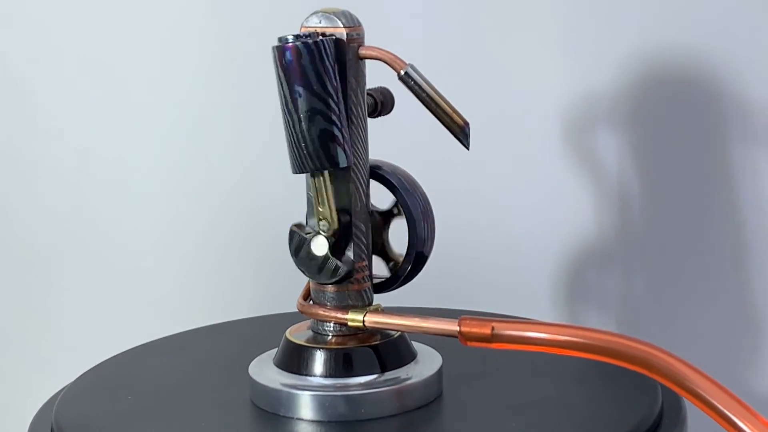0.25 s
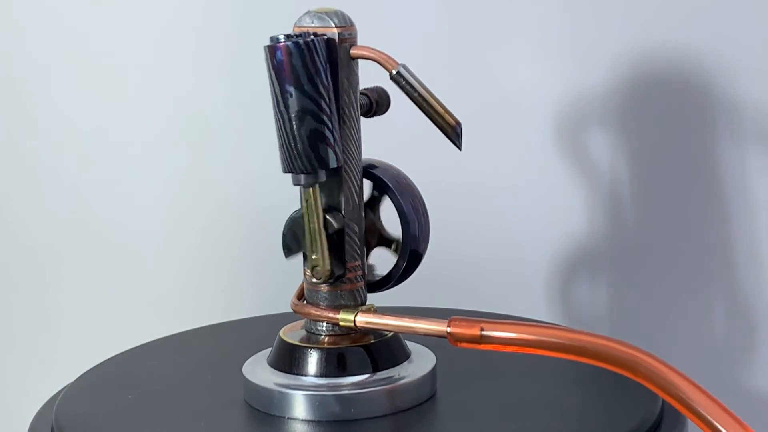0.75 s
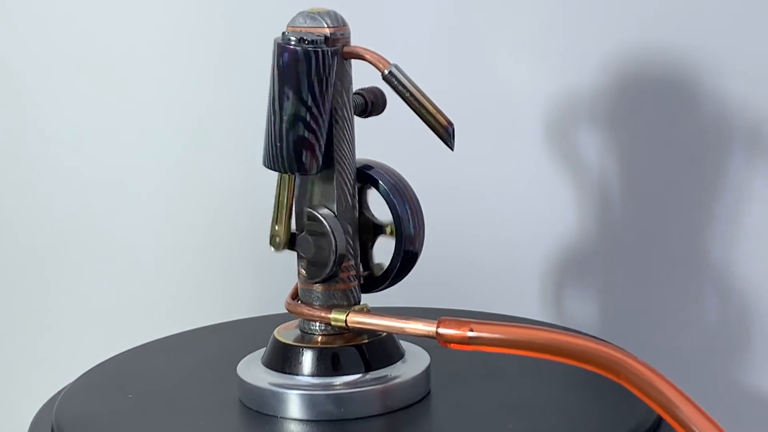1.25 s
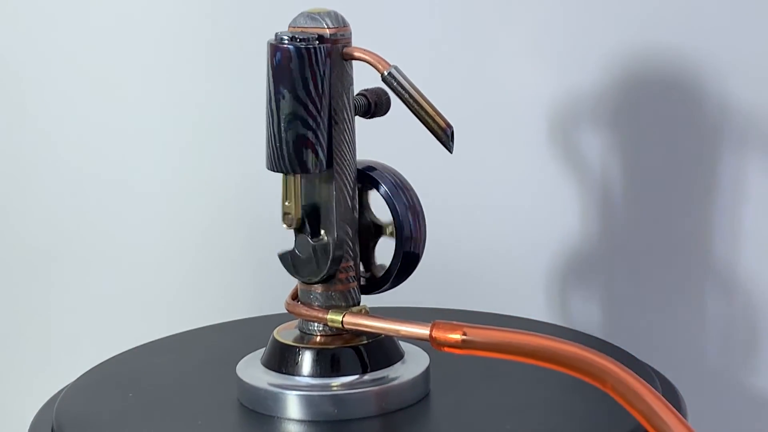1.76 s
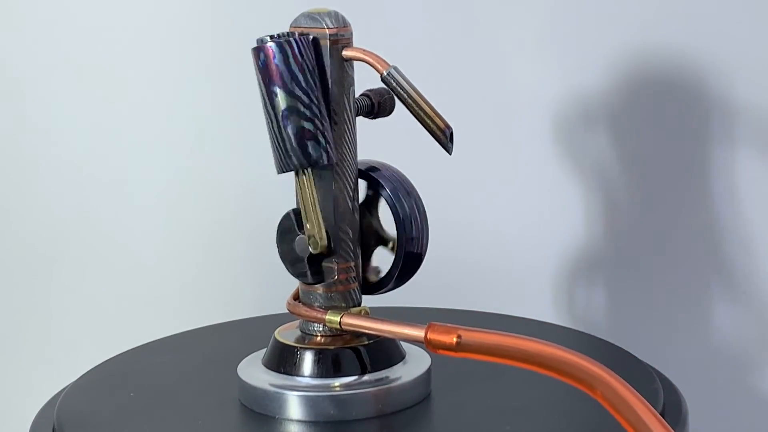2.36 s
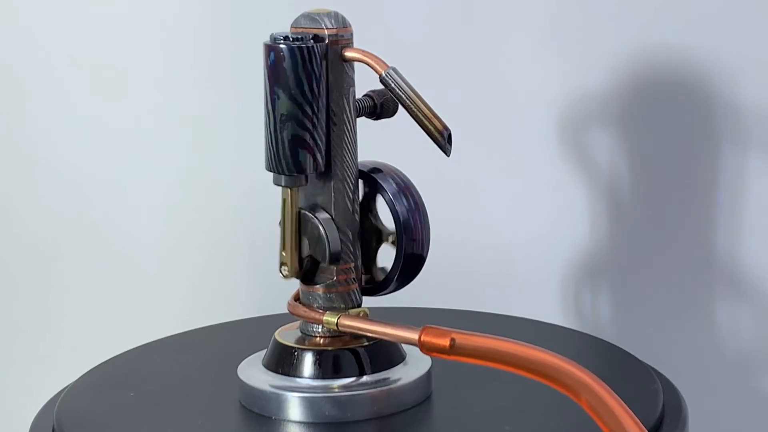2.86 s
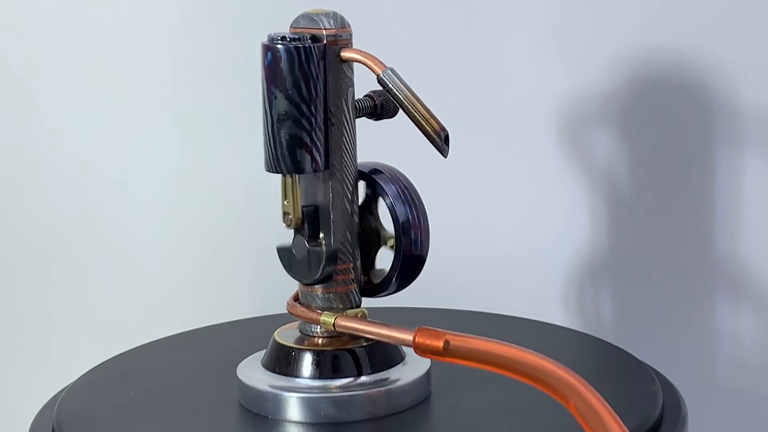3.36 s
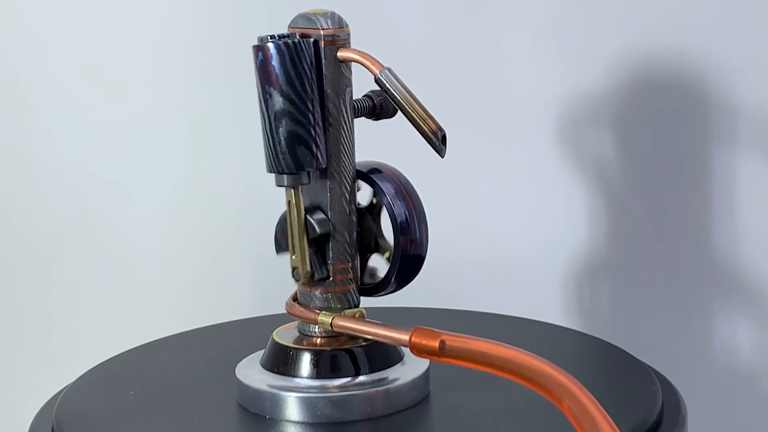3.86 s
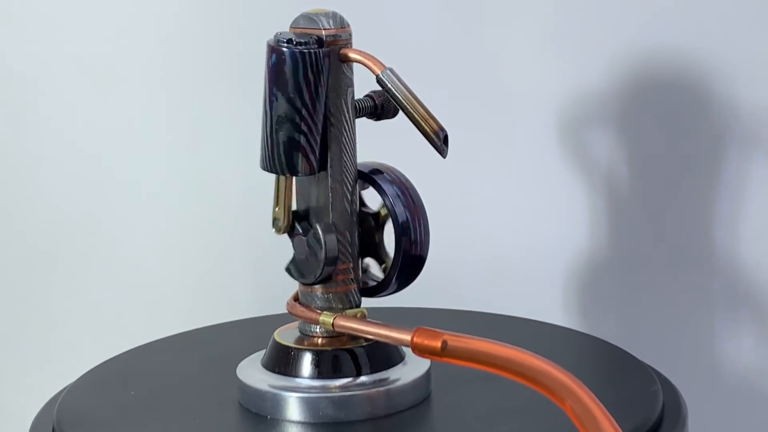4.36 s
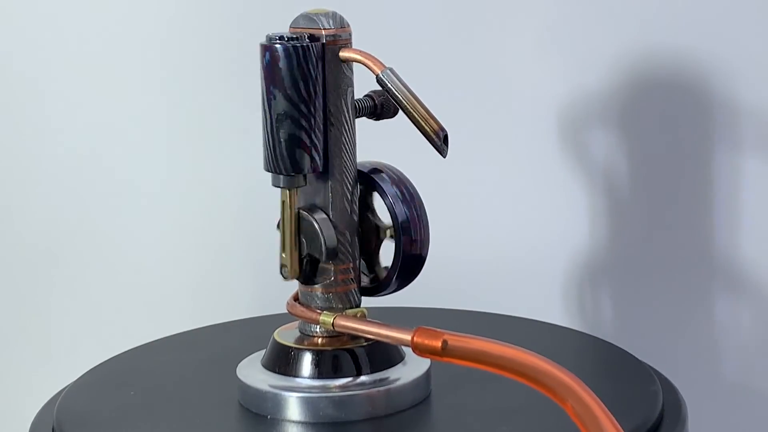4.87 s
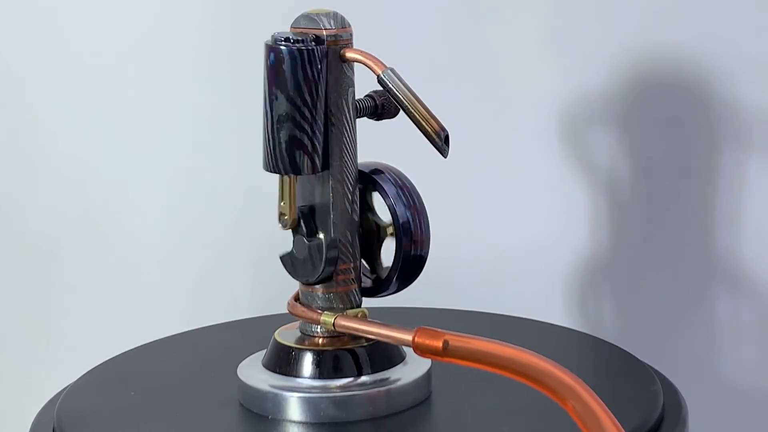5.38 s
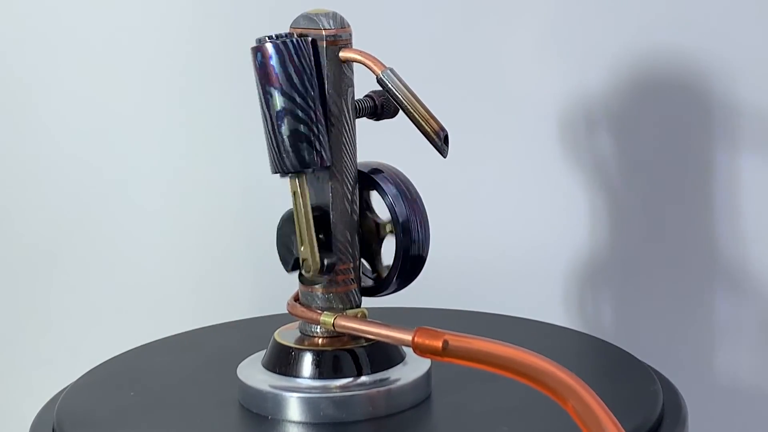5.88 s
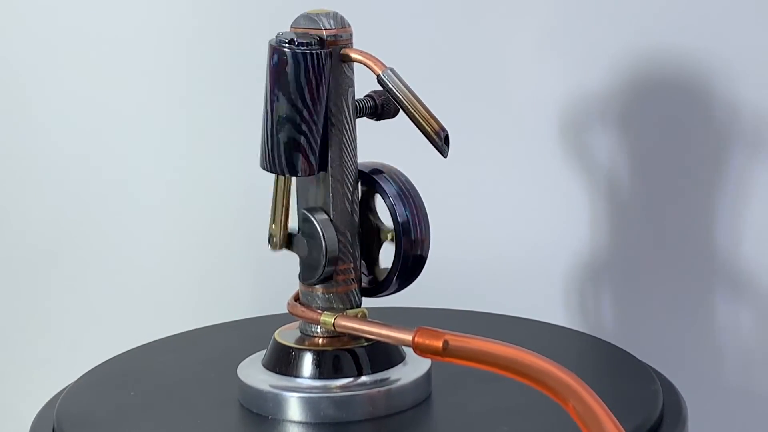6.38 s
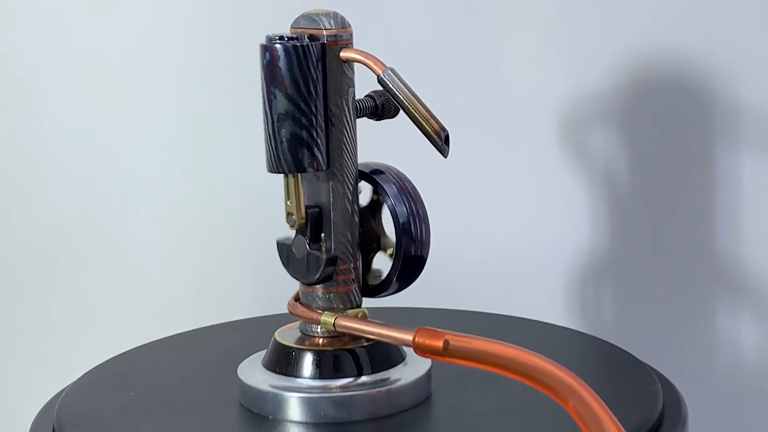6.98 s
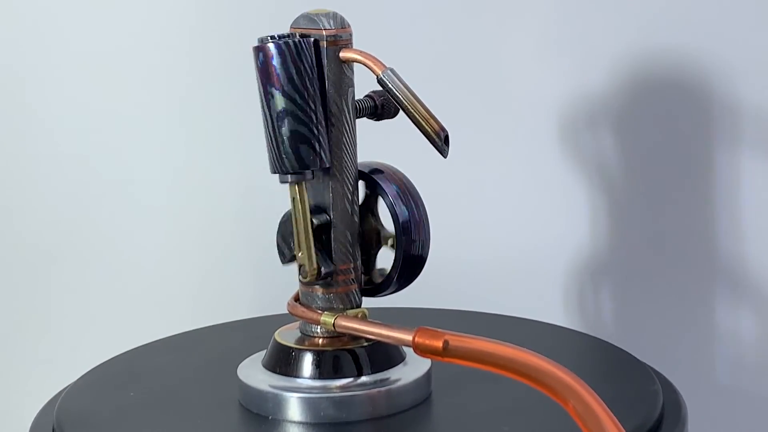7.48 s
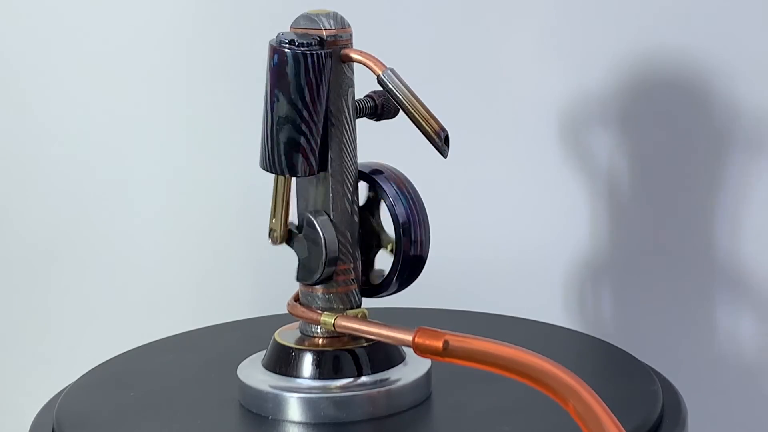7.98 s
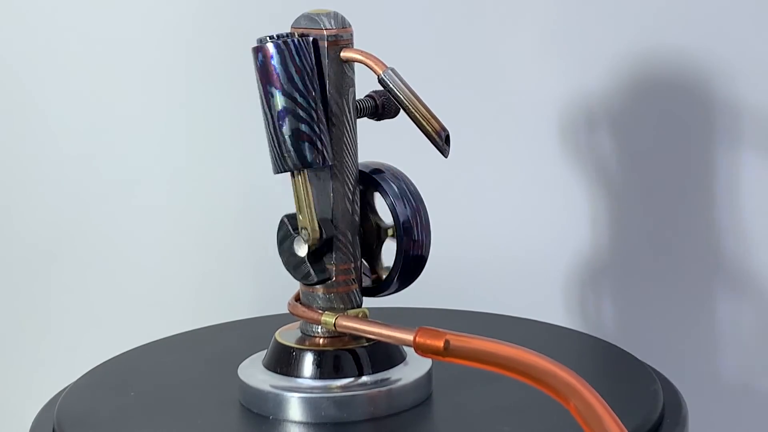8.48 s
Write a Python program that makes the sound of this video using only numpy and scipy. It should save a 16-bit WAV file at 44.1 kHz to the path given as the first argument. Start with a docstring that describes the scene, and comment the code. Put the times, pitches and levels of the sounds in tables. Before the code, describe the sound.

Rapid, buzzing puffs and light knocks from a tiny model engine, with constant high air hiss and a faint low compressor drone behind.

```python
"""Air hisses steadily from a leak, over the rumble of the room and the drone of a far compressor.
A small oscillating-cylinder engine runs on compressed air on a round stand, close to a two-port
microphone. Each turn the crank and piston knock the stand into ringing, the exhaust port spits and
blows, and the cylinder face rubs. Air and rubbing are shaped noise, the stand is a set of decaying
modes, and the compressor is a set of wavering tones."""
import sys
import numpy as np
from scipy import signal
from scipy.fft import rfft, irfft
from scipy.io import wavfile
from scipy.ndimage import uniform_filter1d

SR = 44100
rng = np.random.default_rng(int(sys.argv[2]) if len(sys.argv) > 2 else 0)


def natural_amplitude(level_db):
    """Convert a level in decibels to a linear amplitude factor, elementwise."""
    exponent = np.asarray(level_db, float) / 20
    return 10 ** exponent


def unload_wav(signal):
    """Save mono or channel-first audio to the path in sys.argv[1] as 16-bit WAV at rate SR, clipped to [-1, 1]."""
    wavfile.write(
        sys.argv[1],
        SR,
        np.round(np.clip(np.atleast_2d(signal).T, -1, 1) * 32767).astype(np.int16),
    )


N = 384993
HZ = np.fft.rfftfreq(N, 1 / SR)
T = np.arange(N) / SR


def level(x, db):
    """Scale to an rms level."""
    return x * natural_amplitude(db) / np.sqrt(np.mean(x ** 2))


def colour(points):
    """Gain of (frequency [Hz], level [dB]) points joined on a log frequency axis."""
    hz, db = np.transpose(points)
    return natural_amplitude(np.interp(np.log(HZ + 1), np.log(hz), db))


def rings(peaks):
    """Gain of (frequency [Hz], width at -6 dB [Hz], level [dB]) resonances that add in power."""
    power = sum(natural_amplitude(2 * db) / (1 + (2 * (HZ - hz) / width) ** 2) ** 2 for hz, width, db in peaks)
    return np.sqrt(power)


def noise(gain):
    """Two unrelated noises of one colour, rms 1 over the pair."""
    white = rng.standard_normal((2, N))
    return level(irfft(rfft(white) * gain, N), 0)


def walk(rate):
    """Random levels held 1 / rate s and slewed twice; spread near 1."""
    k = int(SR / rate)
    held = np.repeat(rng.standard_normal(N // k + 1), k)
    return 1.317 * uniform_filter1d(uniform_filter1d(held, k), k)[:N]


def train(times, sizes, shape, lead=0):
    """One copy of a shape at each time, begun lead samples early; copies begun outside N are left out."""
    at = np.round(times * SR).astype(int) - lead
    keep = (at >= 0) & (at < N)
    marks = np.bincount(at[keep], sizes[keep], N)
    return signal.fftconvolve(marks, shape)[:N]


def swell(times, sizes, rise_ms, fall_ms=None):
    """Gaussian bells that peak at the times; the fall may have a spread of its own."""
    ms = np.arange(-SR // 40, SR // 40) / SR * 1000
    spread_ms = np.where(ms < 0, rise_ms, fall_ms or rise_ms)
    bell = np.exp(-.5 * (ms / spread_ms) ** 2)
    return train(times, sizes, bell, lead=len(ms) // 2)


def crank():
    """Start time of every turn, from the running sum of the speed, with one more turn at each end."""
    # crank speed, steady but for small sags of the air pressure: (time [s], speed [turns/s])
    speed = [(0, 18.7553), (.55, 18.5044), (.85, 18.8758), (1.5, 18.2074), (1.9, 18.7617), (2.8, 18.7302),
             (4.05, 18.9318), (4.65, 18.7001), (6.3, 18.8317), (6.6, 18.7514), (7.9, 18.7543),
             (8.73, 18.7242)]
    turn_at_start = .4051  # share of a turn already done at 0 s
    turns = turn_at_start + np.cumsum(np.interp(T, *np.transpose(speed))) / SR
    starts = np.interp(np.arange(1, turns[-1]), turns, T)
    before = 2 * starts[0] - starts[1]
    after = 2 * starts[-1] - starts[-2]
    return np.r_[before, starts, after]


def room():
    """Low broad noise with a deep rumble that wanders and swells."""
    # colour of the room noise: (frequency [Hz], relative level [dB])
    room_colour = [(18, -36), (40, -11.5), (80, 1.5), (130, -8.5), (250, -10.5), (400, -15.5), (700, -20.5),
                   (1200, -21), (2000, -33.5), (4000, -34)]
    # swells of the deepest rumble: (time [s], bell spread [ms], peak level [dB])
    rumble_swells = [(.22, 60, -46), (.62, 60, -37), (1.36, 90, -40), (3.9, 90, -45), (7.15, 70, -52)]
    room_db, rumble_db, wander_db = -44, -55, 3
    rumble = natural_amplitude(rumble_db + wander_db * walk(5))
    for s, spread_ms, db in rumble_swells:
        rumble = rumble + natural_amplitude(db) * np.exp(-.5 * ((T - s) / (spread_ms / 1000)) ** 2)
    broad = natural_amplitude(room_db) * noise(colour(room_colour))
    return broad + rumble * noise(rings([(41.3, 18, 0)]))


def leak(starts):
    """Air hissing and whistling at the valve face, changed as the ports slide past each other."""
    # colour of the hiss: (frequency [Hz], relative level [dB])
    leak_colour = [(1500, -18.5), (2100, -17.5), (2700, -7), (3400, -15), (4100, -9.5), (5200, -7.5),
                   (6500, -7), (8300, -5), (9300, 7), (10200, -17.5), (12800, 5), (14000, -9), (15300, -1),
                   (16500, -2.5)]
    # whistles in the hiss: (frequency [Hz], width [Hz], relative level [dB])
    whistles = [(6840, 83, -28), (7596, 124, 2.5), (11160, 730, 5), (15100, 670, 2)]
    # changes in each turn: (time into the turn [ms], bell spread [ms],
    # share gained under the split [ratio], share gained over the split [ratio])
    port_slide = [(-6, 2.5, -0.31, 0.02), (-6, 5.6, -0.0031, 0.27), (17, 1.3, -0.36, -0.46),
                  (31, 5.1, -0.17, 0.31)]
    leak_db, flicker_db, split_hz = -30, 0.09, 10000
    slide = [swell(starts + ms / 1000, np.ones(len(starts)), spread_ms)
             for ms, spread_ms, _, _ in port_slide]
    under, over = 1 + np.transpose(port_slide)[2:] @ slide
    hiss = noise(np.hypot(colour(leak_colour), rings(whistles)))
    low = irfft(rfft(hiss) / (1 + (HZ / split_hz) ** 8), N)
    return natural_amplitude(leak_db + flicker_db * walk(25)) * (under * low + over * (hiss - low))


def compressor():
    """Far tones on multiples of the pump's turn rate; the room wavers and shifts each between the ports."""
    # multiples of the turn rate that carry: (order [turn rates])
    orders = [2, 4, 6, 11, 19, 21, 22, 23, 28, 29, 33, 36]
    # typical rms level of each tone: (left level [dB], right level [dB])
    tones = [(-59, -58), (-64, -57.5), (-55.5, -60), (-62, -75), (-64.5, -65.5), (-65, -75), (-66, -76),
             (-70, -78), (-72, -70), (-76, -70), (-75, -73), (-66, -69)]
    turn_hz, drift, waver_db = 27.88, .008, 3  # drift is a share of the turn rate
    phase = 2 * np.pi * turn_hz * np.cumsum(1 + drift * walk(3)) / SR
    out = 0
    for k, (left_db, right_db) in zip(orders, tones):
        start, shift = rng.uniform(-np.pi, np.pi, size=2)
        sides = np.array([[0], [shift * min(k / 25, 1)]])  # low tones differ less between the ports
        gain = natural_amplitude(np.array([[left_db], [right_db]]) + waver_db * walk(12))
        out = out + gain * np.sin(k * phase + start + sides)
    return np.sqrt(2) * out


def stand(starts):
    """Half-sine pushes ring the decaying modes of the stand; a longer contact sounds duller."""
    # hard ticks of the crank pin and soft thrusts of the piston:
    # (time into the turn [ms], contact [ms], push [dB], direction and strength [ratio])
    knocks = [(2.16, 2.87, -37, -1.12), (4.12, 0.66, -50, -0.72), (7.76, 6.17, -37.5, -0.87),
              (20.66, 5.95, -39.5, -0.81), (24.65, 0.49, -50, -0.64), (28.96, 0.23, -53.5, 0.65),
              (31.98, 0.75, -50, -0.6), (40.92, 6.2, -38, 1)]
    # modes of the stand: (frequency [Hz], relative level [dB], decay by 60 dB [s])
    modes = [(83.5, -10, 0.082), (120, -15.5, 0.16), (183, -6.5, 0.046), (235.4, 3.5, 0.043),
             (291, -6.5, 0.062), (416, -6, 0.019), (523, 2.5, 0.056), (950, -5.5, 0.029), (1310, -14, .012),
             (1710, -4, 0.011)]
    scatter_db = .9
    t = np.arange(SR // 5) / SR
    ring = sum(natural_amplitude(db) * np.sin(2 * np.pi * hz * t) * np.exp(-np.log(1000) * t / t60)
               for hz, db, t60 in modes)
    chance = rng.standard_normal((len(starts), len(knocks))).T
    force = 0
    for (ms, contact_ms, db, direction), luck in zip(knocks, chance):
        push = np.maximum(np.sin(np.pi * np.minimum(t[:500] / (contact_ms / 1000), 1)), 0)
        sizes = direction * natural_amplitude(db + scatter_db * luck)
        force = force + train(starts + ms / 1000, sizes, push / push.sum())
    return signal.fftconvolve(force, ring)[:N]


def spits(starts):
    """A short ringing spit as the port opens; each resonance takes its own share, the low ones speak later."""
    # strongest spits as the exhaust port cracks open:
    # (time before the resonance's lag [s], level [dB], top ring over the one below [dB])
    strong_spits = [(0.031, -19.9, 2), (0.3005, -20.5, 1), (0.4065, -17.8, -1), (0.4604, -20.6, 1),
                    (0.5687, -18.9, -5), (0.7304, -20.4, 3), (0.7831, -20.6, 3), (0.8366, -19.4, 3),
                    (1.1563, -20.1, 12), (1.4823, -19.7, 1), (1.5378, -19.8, 3), (1.5922, -20.5, 5),
                    (1.7015, -18.0, -2), (1.9693, -20.5, -9), (2.1816, -20.7, 1), (2.2889, -18.5, 8),
                    (2.3957, -19.0, 8), (2.4486, -14.4, 6), (2.5553, -14.7, 21), (2.6085, -20.1, 9),
                    (2.6629, -17.6, 7), (2.8233, -19.0, 1), (2.9833, -20.1, 5), (3.3034, -19.4, 10),
                    (3.3554, -19.7, 1), (3.672, -18.6, -14), (3.8313, -19.3, -5), (3.885, -19.7, 14),
                    (3.9382, -17.4, 6), (4.203, -20.0, 7), (4.4156, -19.5, 7), (4.629, -17.2, 11),
                    (4.7358, -17.3, 9), (4.7894, -20.0, 7), (4.9486, -19.3, -2), (5.1091, -19.6, -1),
                    (5.2151, -19.2, -3), (5.2684, -20.5, -7), (5.4284, -19.3, -9), (5.5895, -20.4, 3),
                    (5.748, -16.5, -10), (6.0676, -18.0, -4), (6.121, -18.6, 4), (6.174, -18.4, 0),
                    (6.387, -17.9, 12), (6.9179, -19.5, 3), (6.972, -19.8, -2), (7.0256, -19.0, 2),
                    (7.1855, -20.1, -8), (7.2398, -18.2, 6), (7.2935, -20.5, 13), (7.5597, -18.6, 2),
                    (7.6129, -19.7, 6), (7.7204, -20.7, 7), (7.7732, -17.2, 6), (7.8264, -16.6, 6),
                    (7.8794, -20.7, 1), (7.9338, -20.0, 7), (7.9847, -20.0, 11), (8.0377, -18.9, 0),
                    (8.1453, -17.7, 2), (8.6261, -19.8, 5)]
    # resonances of port and pipe: (frequency [Hz], width [Hz], relative level before width is counted [dB])
    spit_ring = [(1710, 400, -38), (4270, 3500, -30.5), (6500, 890, -16.5), (8400, 4400, -24),
                 (11180, 1500, -6), (14960, 500, 0.5)]
    lead_ms, jitter_ms, lag_cycles = 0.51, .35, 2.5  # lead on the turn's start; lag of each resonance
    usual_db, scatter_db, ceiling_db, ring_scatter_db = -21.3, 1.1, -20.3, 2
    rise_ms, fall_ms = 1.55, 1.4
    chance = rng.standard_normal((len(starts), 2 + len(spit_ring)))
    at = starts - lead_ms / 1000 + jitter_ms / 1000 * chance[:, 0]
    db = np.minimum(usual_db + scatter_db * chance[:, 1], ceiling_db)
    _, widths, ring_db = np.transpose(spit_ring)
    share = natural_amplitude(ring_db + ring_scatter_db * chance[:, 2:]) * np.sqrt(widths)
    for s, peak_db, top_db in strong_spits:
        turn = np.argmin(abs(starts - s))
        at[turn], db[turn] = s, peak_db
        share[turn, -1] = share[turn, -2] * natural_amplitude(top_db)
    share = share / np.linalg.norm(share, axis=1, keepdims=True)
    out = 0
    for (hz, width, _), part in zip(spit_ring, share.T):
        jet = noise(rings([(hz, width, 0)]))
        jet = jet / np.sqrt(uniform_filter1d(jet ** 2, size=50))  # evens out the noise's own swells
        out = out + swell(at + lag_cycles / hz, natural_amplitude(db) * part, rise_ms, fall_ms) * jet
    return out


def blow(starts):
    """Exhaust rushes out as broad noise after the port opens, and dies off slower than it rises."""
    # the blow in each turn: (time into the turn [ms], rise spread [ms], peak level [dB], scatter [dB])
    blow_bell = (8.5, 5, -28.5, 2.5)
    # colour of the blow: (frequency [Hz], relative level [dB])
    blow_colour = [(1500, -28), (2100, -28), (2650, -4.5), (4500, -9), (6500, -6.5), (9000, -1.5),
                   (12500, -1.5), (14000, -6), (15200, 0), (16500, 0)]
    ms, rise_ms, peak_db, scatter_db = blow_bell
    sizes = natural_amplitude(peak_db + scatter_db * rng.standard_normal(len(starts)))
    return swell(starts + ms / 1000, sizes, rise_ms, fall_ms=6.7) * noise(colour(blow_colour))


def rubbing(starts):
    """Resonant scraping of the cylinder face twice a turn, nearer the left port; the second is brighter."""
    # rubs, hardest mid-swing: (time into the turn [ms], bell spread [ms], left peak level [dB],
    # brightness about 1 kHz [dB per octave])
    rubs = [(10.4, 5.3, -45.5, 0), (30.2, 5.8, -46.5, 8)]
    # resonances of the scrape: (frequency [Hz], width [Hz], relative level [dB])
    rub_ring = [(578, 77, 3.5), (793, 320, 0), (972, 92, 1.5), (1320, 350, -1), (1730, 190, -6.5),
                (2042, 14, 0.5)]
    scatter_db, right_db = 1.5, -3.5
    chance = rng.standard_normal((len(starts), len(rubs))).T
    out = 0
    for (ms, spread_ms, db, bright_db), luck in zip(rubs, chance):
        tilt = natural_amplitude(bright_db * np.log2(HZ / 1000 + 0.11))
        scrape = noise(rings(rub_ring) * tilt)
        out = out + swell(starts + ms / 1000, natural_amplitude(db + scatter_db * luck), spread_ms) * scrape
    return out * natural_amplitude(np.array([[0], [right_db]]))


def two_channels(pair, like_floor=0., like_top=1.):
    """Share two strands of a sound between left and right, with a likeness, lag and balance by frequency."""
    # likeness and balance of the two channels: (frequency [Hz], likeness [0-1], left minus right level [dB])
    agree = [(30, 0.98, -0.5), (447, 0.91, 0.4), (770, 0, -0.5), (1330, 0.24, 6), (2030, 0.45, -2.5),
             (2380, 0.49, 2), (2850, 0.99, 2.5), (2917, 0.02, 0), (3107, 1, 2), (3500, 1, -0.5),
             (3230, 0, 3), (5350, 0.17, -4.5), (6500, 0.07, -4.5), (6800, 1, -0.5), (7600, 0.98, 0)]
    # phase between the channels below the late treble: (frequency [Hz], left lag [rad])
    low_lag = [(400, 0), (1300, .5), (2250, -3), (3100, -2.5)]
    left_late_ms, late_above_hz = .2595, 3600  # treble from the engine reaches the left port late
    agree_hz, likeness, balance = np.transpose(agree)
    like = np.interp(HZ, agree_hz, likeness)
    balance_db = np.interp(HZ, agree_hz, balance)
    late = 2 * np.pi * HZ * left_late_ms / 1000
    lag = np.where(HZ > late_above_hz, late, np.interp(HZ, *np.transpose(low_lag)))
    like = np.clip(like, like_floor, min(like_top, 1))
    common, unlike = rfft(pair) * np.sqrt([(1 + like) / 2, (1 - like) / 2])
    left = (common + unlike) * natural_amplitude(balance_db / 2) * np.exp(-1j * lag)
    right = (common - unlike) * natural_amplitude(-balance_db / 2)
    return irfft([left, right], N)


def scene():
    """Engine and room shared between the channels; rubbing and the compressor set their own level in each."""
    starts = crank()
    knocks = stand(starts)
    air = two_channels(blow(starts) + leak(starts) + room())
    air = air + two_channels(spits(starts), like_top=.85)
    knocking = two_channels(np.array([knocks, knocks]), like_floor=0.98)
    return air + knocking + rubbing(starts) + compressor()


def roll_off(x):
    """The treble ends steeply here."""
    return signal.sosfilt(signal.butter(12, 16960, fs=SR, output="sos"), x)


def record(dry):
    """The microphone cuts the lowest bass."""
    bass_cut = signal.butter(2, 29.7, "high", fs=SR, output="sos")
    mix = signal.sosfilt(bass_cut, dry)
    return roll_off(mix)


dry = scene()
out = record(dry)
unload_wav(out)
```